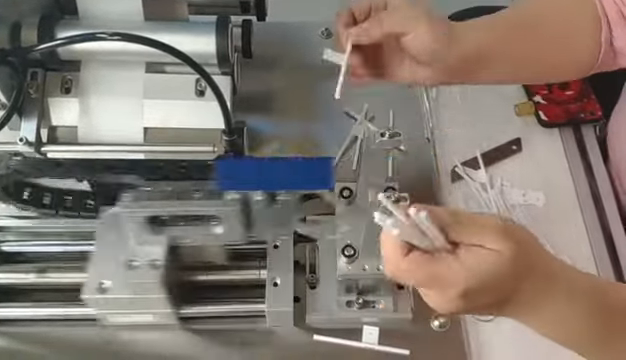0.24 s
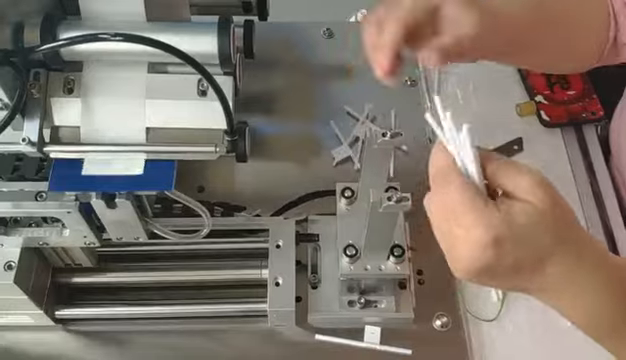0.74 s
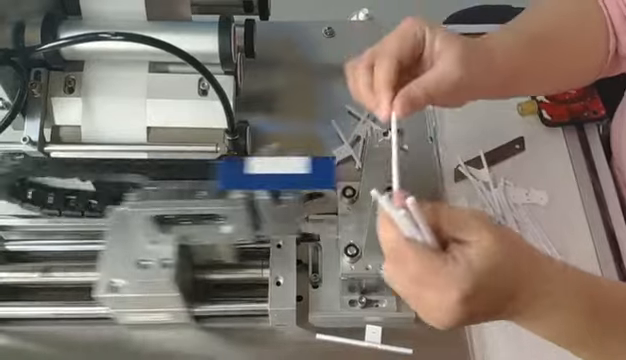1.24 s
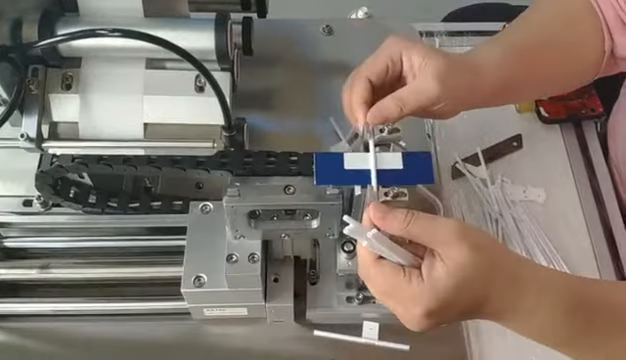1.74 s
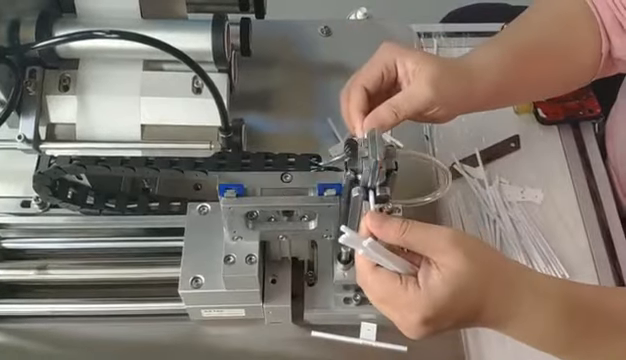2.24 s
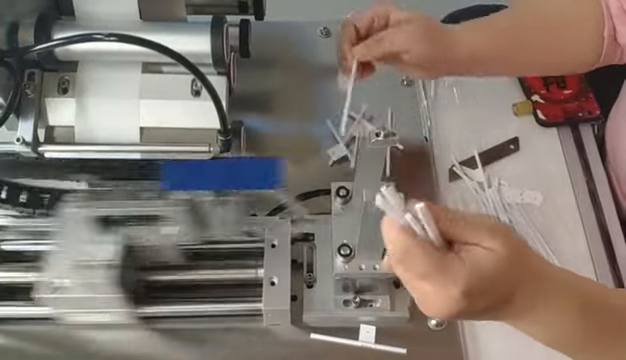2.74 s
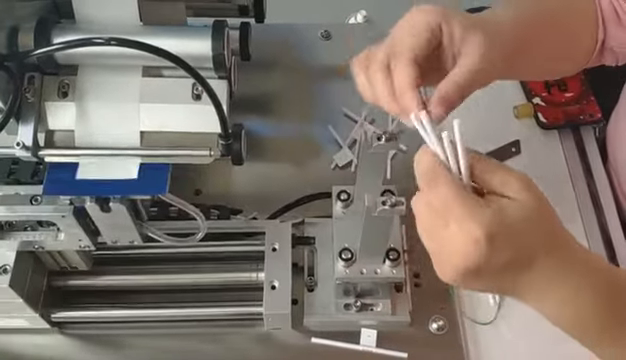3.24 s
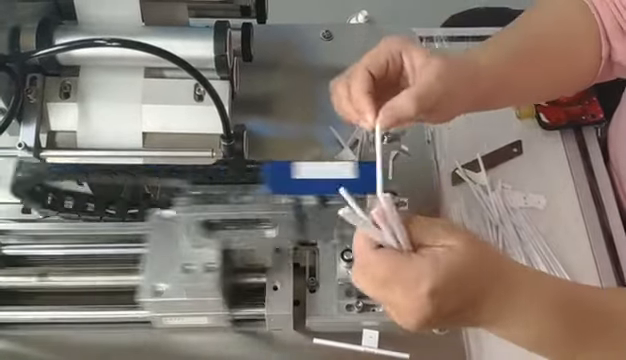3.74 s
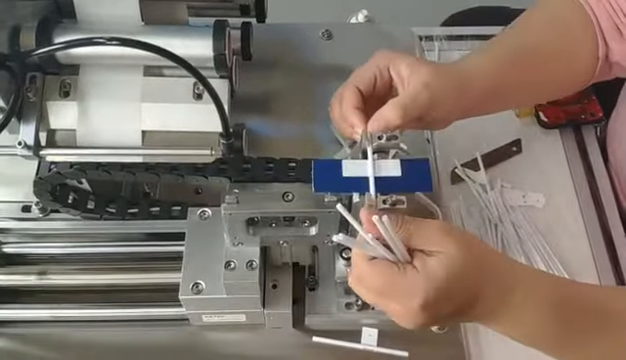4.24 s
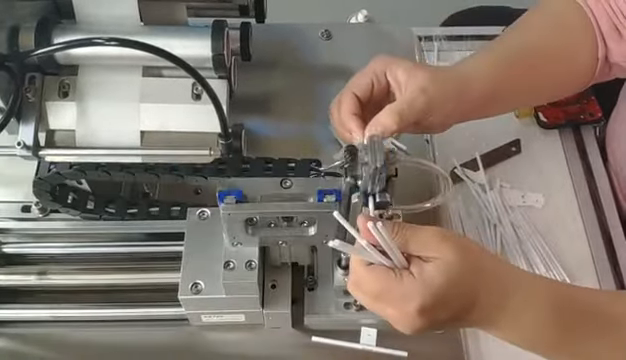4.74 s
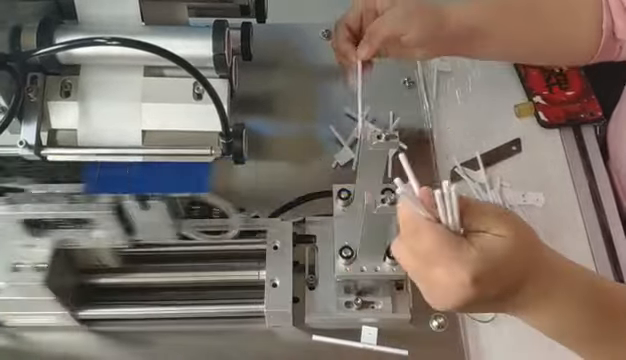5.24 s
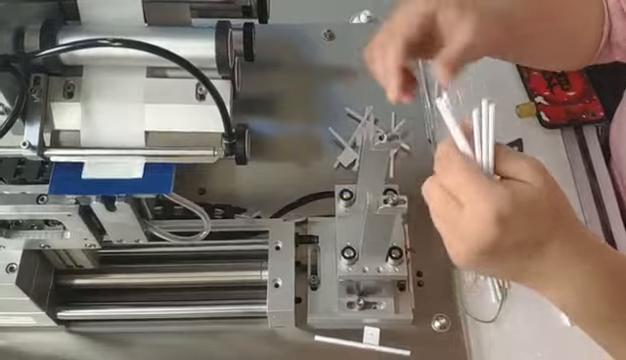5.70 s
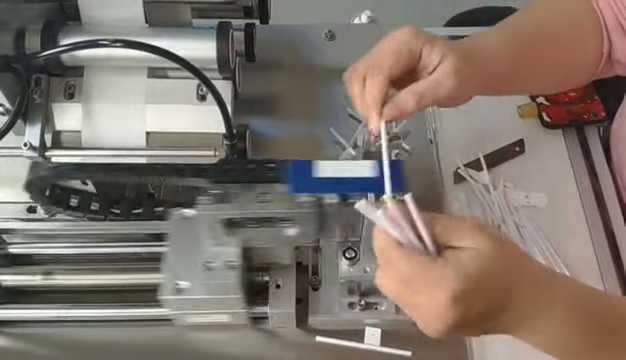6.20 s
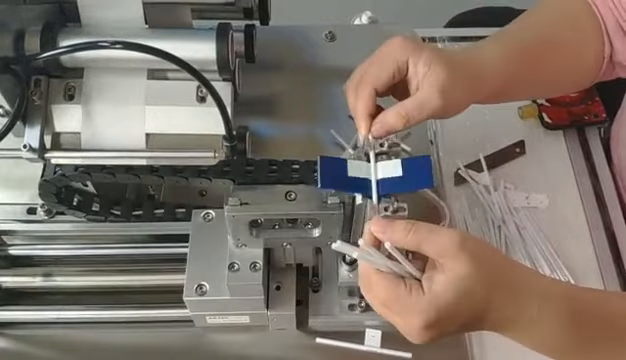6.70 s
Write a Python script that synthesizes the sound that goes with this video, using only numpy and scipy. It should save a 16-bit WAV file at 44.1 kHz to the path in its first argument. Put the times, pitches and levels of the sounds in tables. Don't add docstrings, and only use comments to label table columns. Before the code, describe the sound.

A pneumatic machine cycles on a bench: whistling suction hiss, sharp jaw clack, air puffs, a sliding bang, then a short air blast, over low rumble.

```python
import sys
import numpy as np
from scipy import signal
from scipy.fft import rfft, irfft, next_fast_len
from scipy.io import wavfile
from scipy.ndimage import uniform_filter1d, map_coordinates

SR = 44100
rng = np.random.default_rng(int(sys.argv[2]) if len(sys.argv) > 2 else 0)


def rack_gain(trim_db):
    fader = np.asarray(trim_db, float)
    return 10 ** (fader / 20)


def materialize(psi):
    bounded = np.clip(np.atleast_2d(psi).T, -1, 1)
    quanta = np.round(bounded * 32767).astype(np.int16)
    wavfile.write(sys.argv[1], SR, quanta)


N = 306936


def unit(x):
    return x / np.sqrt(np.mean(np.mean(np.atleast_2d(x), axis=0) ** 2) + 1e-20)


def along(points, hz):
    f, v = np.transpose(points)
    return np.interp(np.log(hz + 1), np.log(f + 1), v)


def since(s):
    return np.maximum(np.arange(N) / SR - s, 0)


def wobble(rate):
    knots = rng.standard_normal(int(N * rate / SR) + 4)
    return map_coordinates(knots, [np.arange(N) * rate / SR])


def filtered(x, response):
    m = next_fast_len(N + SR // 2)
    return irfft(rfft(x, m) * response(np.fft.rfftfreq(m, 1 / SR)), m)[..., :N]


def add(track, s, sound):
    part = track[..., max(round(s * SR), 0):][..., :sound.shape[-1]]
    part += sound[..., :part.shape[-1]]


# freq_hz, likeness
DIFFUSE_LIKENESS = [(30, .965), (240, .955), (490, .8), (900, .25), (1500, -.25), (2600, -.3), (6000, .05)]


def rush(spectrum, lean, patchy_db, bumps=(), alike=DIFFUSE_LIKENESS, lag=0):
    z = signal.stft(rng.standard_normal((2, N)), nperseg=512)[2]
    field = uniform_filter1d(rng.standard_normal(z.shape[1:]), size=4, axis=0)
    field = uniform_filter1d(field, size=8, axis=1)
    pair = signal.istft(z * rack_gain(patchy_db * field / field.std()), nperseg=512)[1][:, :N]

    def mid_side_gain(f):
        resonance = 1 + sum(rack_gain(db) / (1 + (2 * (f - c) / w) ** 2) for c, w, db in bumps)
        turn = np.arccos(np.clip(along(alike, f), -1, 1)) / 2
        return rack_gain(along(spectrum, f)) * resonance * np.array([np.cos(turn), np.sin(turn)])

    mid, side = filtered(pair, mid_side_gain)
    ports = np.array([mid + side, mid - side])
    left, right = filtered(ports, lambda f: rack_gain(along(lean, f) * np.array([[.5], [-.5]])))
    return unit(np.array([left, np.roll(right, shift=lag)]))


# freq_hz, level_db per Hz
NOZZLE_AIR = [(4500, -20), (5500, -30), (6200, -1), (6700, -1), (7200, 1.5), (7800, -7)]
JET_AIR = [(700, -27.5), (1400, -12), (2000, -5.5), (2300, -2), (2550, -0.5), (3250, 0), (3630, -1),
           (4000, 0), (4700, -2.5), (6000, 2.5), (7800, -22.5)]
# freq_hz, width_hz, level_db
WHISTLE = [(6542, 55, -1), (6910, 50, 2), (7113, 30, 8), (7310, 48, 4)]
HOSE = [(2078, 240, -4.5), (2490, 77, 1), (3237, 750, -0.5), (3920, 79, -6.5)]
# freq_hz, lean_db
LEFT_PORT = [(2500, .5), (4800, .5), (5800, 7), (6500, 11), (7200, 13)]
# freq_hz, likeness
DIRECT_LIKENESS = [(800, 0.27), (2500, 0.45), (4700, 0.16), (5500, 0.17), (7200, 0.043)]
# freq_hz, likeness
JET_LIKENESS = [(700, .6), (1050, .15), (1700, -.4), (2400, -.35), (3400, -.25), (3950, .3), (4700, -.35),
                (5600, 0)]


def air():
    nozzle = flow(hold_db=-29, surge_db=7.5, drop_db_per_s=117.5, leak_db=-40.5)
    nozzle = nozzle + puffs(opening_db=-31, return_db=-15.5)
    jet = flow(hold_db=-38, surge_db=1.3, drop_db_per_s=50, leak_db=-42)
    jet = jet + puffs(opening_db=-23.5, return_db=-28.5)
    gust = wobble(14)
    flutter = rack_gain(0.69 * gust + 1.2 * wobble(45))
    whistling = rush(NOZZLE_AIR, LEFT_PORT, patchy_db=-1.5, bumps=WHISTLE, alike=DIRECT_LIKENESS, lag=6)
    hissing = rush(JET_AIR, LEFT_PORT, patchy_db=3.0, bumps=HOSE, alike=JET_LIKENESS)
    return nozzle * flutter * whistling + jet * rack_gain(1.1 * gust) * hissing


GRIP_DELAY_S, GRIP_S, SETTLE_S = .03, 0.021, 0.35
LET_GO_S = 0.019
LEAK_SAG_DB_PER_S = 5
LEAK_PAST_STOP_S, LEAK_STEP_DB, LEAK_DROP_DB_PER_S = 0.028, -5.5, 25


def flow(hold_db, surge_db, drop_db_per_s, leak_db):
    out, t = np.zeros(N), np.arange(N) / SR
    grips = [-np.ptp(t)] + [s + length + GRIP_DELAY_S for s, db, length in BLASTS]
    ends = [(a[0], b[0]) for a, b in zip(OPENINGS, RETURNS)] + [(2 * t[-1], 2 * t[-1])]
    for grip, (opening, back) in zip(grips, ends):
        held = since(grip)
        level_db = hold_db + surge_db * np.exp(-held / SETTLE_S) - drop_db_per_s * since(opening - LET_GO_S)
        out += (1 - np.exp(-held / GRIP_S)) ** 2 * rack_gain(level_db) * (t < back)
    for (back, _), (stop, _), (blast_s, *_) in zip(RETURNS, STOPS, BLASTS):
        shut = since(stop + LEAK_PAST_STOP_S)
        level_db = leak_db - LEAK_SAG_DB_PER_S * since(back)
        level_db = level_db + LEAK_STEP_DB * (1 - np.exp(-shut / .008)) - LEAK_DROP_DB_PER_S * shut
        out += rack_gain(level_db) * (t >= back) * (t < blast_s)
    return out


# start_s, peak_db
OPENINGS = [
    (0.187, -19),
    (2.6, -20),
    (4.999, -20),
]
# start_s, peak_db
RETURNS = [
    (0.283, -16.5),
    (2.698, -15.5),
    (5.098, -15),
]


def puffs(opening_db, return_db):
    def puff(s, db, t60):
        return rack_gain(db - 60 * since(s) / t60) * (1 - np.exp(-since(s) / 0.0065)) ** 2

    opening = sum(puff(s, opening_db, 0.095) for s, _ in OPENINGS)
    leaving = sum(puff(s + .011, return_db, 0.16) for s, _ in RETURNS)
    return opening + leaving


# start_s, level_db, length_s
BLASTS = [
    (0.981, -18, .107),
    (3.395, -17.5, 0.11),
    (5.8, -17.5, .1),
]
# freq_hz, level_db per Hz
BLAST_AIR = [(300, -14), (600, -17.5), (1300, -9), (1800, -13), (2300, -5.5), (2650, -5), (3500, -5),
             (4300, -9.5), (5600, -2.5), (6500, 3), (7300, -0.5)]
# freq_hz, lean_db
RIGHT_SIDE = [(350, -4), (1300, -7), (1900, -3), (2900, -17), (3700, -12), (4500, -3), (5800, -5.5),
              (6500, -3), (7200, 1)]


def blast():
    level = 0
    for s, db, length in BLASTS:
        shut = since(s + length - .006)
        hose_dregs = rack_gain(-4.5 - 60 * shut / 0.34)
        fall = np.maximum(rack_gain(-60 * shut / .05), hose_dregs)
        snap = (1 - np.exp(-since(s - .007) / 0.0026)) ** 2
        fill = 1 - 0.16 * np.exp(-since(s) / 0.016)
        level = level + rack_gain(db) * fall * snap * fill
    noise = rush(BLAST_AIR, RIGHT_SIDE, patchy_db=2.5, alike=DIRECT_LIKENESS, lag=9)
    return level * rack_gain(0.27 * wobble(90)) * noise


# start_s, peak_db
STOPS = [
    (0.657, -19),
    (3.072, -18.5),
    (5.471, -18.5),
]
# freq_hz, level_db, t60_s
STOP_BLOCK = [(750, 5, 0.11), (932, 8.5, 0.1), (1361, 1.5, 0.1), (1520, -18, 0.026), (1987, -22, 0.066),
              (2323, 3.5, 0.083), (2634, 17.5, 0.063), (3246, 12, 0.073), (3380, -25.5, 0.14),
              (3500, -6, 0.15), (4370, -21, 0.027), (4940, -12, 0.022)]


def slide_stop():
    out = np.zeros(N)
    for s, db in STOPS:
        cushion = ring(STOP_BLOCK, stretch=0.47, contact=0.0099, crack=1.7, low_hz=1210)
        blow = ring(STOP_BLOCK, stretch=.3, contact=0.0036, crack=3.6, low_hz=1298)
        rebound = ring(STOP_BLOCK, stretch=0.67, contact=0.0046, crack=2.3, low_hz=687)
        add(out, s - .022, rack_gain(db - 17) * cushion)
        add(out, s - .001, rack_gain(db - 5.5) * blow)
        add(out, s + 0.014, rack_gain(db - 15) * rebound)
    return out


# start_s, peak_db
CLACKS = [
    (2.324, -16.5),
    (4.726, -16),
]
# freq_hz, level_db, t60_s
JAW_MODES = [(357, -8, 0.11), (526, 4.5, 0.041), (828, 8, 0.042), (896.4, -0.5, 0.15), (1260, -9, 0.087),
             (1417, 5.5, 0.051), (1830, -27.5, 0.045), (2220, 15.5, 0.025), (2390, 9, 0.054),
             (3400, -36, .05), (3800, 6.5, 0.13), (6100, -3, 0.38), (5670, -15.5, 0.071)]


def jaws():
    out = np.zeros(N)
    for s, db in CLACKS:
        touch = ring(JAW_MODES, stretch=0.34, contact=0.005, crack=3.1, low_hz=1430)
        blow = ring(JAW_MODES, stretch=0.55, contact=0.0021, crack=1.1, low_hz=403)
        rebound = ring(JAW_MODES, stretch=0.7, contact=0.0046, crack=0.91, low_hz=890)
        rattle = ring(JAW_MODES, stretch=0.3, contact=0.0024, crack=1.2, low_hz=880)
        add(out, s - .014, rack_gain(db - 12) * touch)
        add(out, s - .001, rack_gain(db - 5.5) * blow)
        add(out, s + 0.013, rack_gain(db - 19.5) * rebound)
        add(out, s + 0.045, rack_gain(db - 15) * rattle)
    return out


def ring(modes, stretch, contact, crack, low_hz):
    t = np.arange(SR // 2) / SR
    draw = rng.standard_normal((len(modes), 3))
    tone = 0
    for (hz, db, t60), (louder, detune, turn) in zip(modes, draw):
        decay = rack_gain(db + 0.77 * louder - 60 * t / (t60 * stretch))
        tone = tone + decay * np.sin(2 * np.pi * (hz * (1 + 0.023 * detune) * t + turn))
    rattle = t / contact * np.exp(1 - t / contact) * rng.standard_normal(len(t))
    band = signal.butter(2, [low_hz, 4500], "bandpass", fs=SR, output="sos")
    clatter = signal.sosfilt(band, rattle)
    return tone * (1 - np.exp(-t / contact)) ** 2 + crack * clatter


# start_s, peak_db, left_over_right_db
TICKS = [
    (0.74, -29, 10.0),
    (0.8334, -31, 2),
    (0.9728, -35.5, -14),
    (3.114, -32, 5.5),
    (3.1306, -23.5, 4),
    (3.376, -33.5, 10),
    (5.657, -29, 11.5),
    (5.792, -30.5, 10),
]
# freq_hz, level_db
TICK_COLOUR = [(1000, -15), (2000, 0.5), (5000, -0.5), (7300, 4), (8400, -6), (8900, -54)]


def ticks():
    out, t = np.zeros((2, N)), np.arange(SR // 20) / SR
    for s, db, pan_db in TICKS:
        shape = t / .0015 * np.exp(1 - t / .0015)
        burst = rack_gain(db + 1) * shape * rng.standard_normal((2, len(t)))
        add(out, s - .002, burst[0] * rack_gain(pan_db * np.array([[.5], [-.5]])))
        add(out, s + 0.013, rack_gain(-16.5) * burst)
    ports = np.array([out[0], np.roll(out[1], shift=6)])
    return filtered(ports, lambda f: rack_gain(along(TICK_COLOUR, f)))


def carriage():
    out, t = np.zeros(N), np.arange(SR // 20 * 2) / SR
    hum = np.sin(2 * np.pi * 374 * t) + .6 * np.sin(2 * np.pi * 1.3 * 374 * t)
    for s, db in RETURNS:
        add(out, s + 0.065, rack_gain(db - 16 - 60 * t / 0.3) * (1 - np.exp(-t / 0.013)) * hum)
    return out


def bench():
    out = np.zeros(N)
    t = np.arange(-SR // 20, SR // 20) / SR
    for s, db, (shoves, knocks) in strokes():
        for delay, over_db, hz in shoves:
            u = (np.pi * hz * t) ** 2
            add(out, s + delay + t[0], rack_gain(db + over_db) * (2 * u - 1) * np.exp(-u))
        for delay, over_db, stretch in knocks:
            add(out, s + delay, rack_gain(db + over_db) * knock(stretch))
    return out


# start_s, peak_db
FOLDS = [
    (2.152, -21),
    (4.552, -25),
    (6.815, -25),
]
# start_s, peak_db
ARRIVALS = [
    (1.622, -31),
    (4.04, -31),
    (6.44, -30),
]
# delay_s, level_db, ring_time_factor
FOLD = [(.009, 1, 98), (.054, 1, 140)], [(0.00037, 1, 0.28)]
OPENING = [(.008, .7, 90.5)], [(-.004, -5, 0.61)]
RETURN = [(.023, -3, 90), (.071, -8.5, 117)], [(0, -0.5, .3), (.022, -9, .61), (.048, -15, .4),
          (.065, -14, .7)]
STOP = [(.019, 1.5, 167)], [(.011, 1.2, .92)]
VALVE_ON = [(.004, -22, 83.6)], [(0, -9.5, 0.48)]
VALVE_OFF = [(.003, -7.5, 94.3)], []
ARRIVAL = [(.014, 2.8, 128.5)], [(0, 0, 1.03)]


def strokes():
    kinds = [(FOLDS, FOLD), (OPENINGS, OPENING), (RETURNS, RETURN), (STOPS, STOP), (ARRIVALS, ARRIVAL)]
    out = [(s, db, push) for rows, push in kinds for s, db in rows]
    for s, db, length in BLASTS:
        out += [(s, db, VALVE_ON), (s + length, db, VALVE_OFF)]
    return out


# freq_hz, level_db, t60_s
FRAME = [(120, -5, 0.47), (153, 0.5, 0.4), (167.7, -8, 0.17), (216, -1, 0.21), (232.4, -0.5, 0.17),
         (292, -0.5, .4), (330.3, -5, 0.17), (383.3, 5.5, 0.11), (453, -6, 0.47), (536, -11.5, 0.48),
         (662, -16.5, 0.42), (807, -8, 0.25), (1063, -8, 0.15), (1400, -10.5, 0.061)]


def knock(stretch):
    t = np.arange(SR // 2) / SR
    draw = rng.standard_normal((len(FRAME), 2))
    drift = np.cumsum(.022 * rng.standard_normal((len(FRAME), len(t))), axis=1)
    drift = uniform_filter1d(drift, size=200, axis=1)
    modes = 0
    for (hz, db, t60), (louder, detune), wander in zip(FRAME, draw, drift):
        decay = rack_gain(db + 2 * louder - 60 * t / (t60 * stretch))
        modes = modes + decay * np.sin(2 * np.pi * hz * (1 + .03 * detune) * t + wander)
    return (1 - np.exp(-t / 0.0012)) / 3 * modes


# freq_hz, level_db per Hz
RUMBLE = [(8.8, -32.5), (15, -18.5), (38, 0.5), (59, -6), (86, -10.5), (120, -21.5), (160, -51.5),
          (260, -120)]
DRONE = [(50, -25.5), (110, -1.5), (200, -4), (290, -5), (450, -11), (700, -14), (1000, -30)]
MURMUR = [(350, -21.5), (600, -5.5), (1000, -1.5), (1500, -7.5), (2500, -8), (4500, -14), (7800, -22)]


def shop():
    shudder = 0
    for s, db in RETURNS + STOPS:
        shudder = shudder + rack_gain(db - 60 * since(s) / .9) * (1 - np.exp(-since(s) / 0.036))
    rumble = rack_gain(-44 + 1.5 * wobble(9) + 1.2 * wobble(3)) * rush(RUMBLE, LEFT_PORT, patchy_db=1.1)
    drone_level = (rack_gain(-42.5) + rack_gain(-20.5) * shudder) * rack_gain(1.5 * wobble(6))
    drone = drone_level * rush(DRONE, LEFT_PORT, patchy_db=1.0)
    murmur = (rack_gain(-52.5) + rack_gain(-29.5) * shudder) * rush(MURMUR, LEFT_PORT, patchy_db=1.0)
    return rumble + drone + murmur


# freq_hz, t60_s
WALLS = [(150, 0.17), (1000, 0.48), (8000, 0.17)]


def room(x):
    hz, t, z = signal.stft(rng.standard_normal((2, SR // 2)), SR, nperseg=256)
    tail = signal.istft(z * rack_gain(-60 * t / along(WALLS, hz)[:, None]), SR, nperseg=256)[1]
    tail = tail / np.linalg.norm(tail[0])
    return signal.fftconvolve(np.pad(x, (300, 0))[None], tail, axes=1)[:, :N]


TOP_HZ = 7550
# freq_hz, step_db
COARSE = [(150, -14), (500, -6), (1100, 4), (2000, 6), (3200, 5), (4800, 6.5), (5600, -2), (6500, -10)]
# freq_hz, step_db
SIDE_COARSE = [(250, 2), (400, -7), (600, -40)]


def phone(x, size=1024):
    k, n = np.arange(int(TOP_HZ * 2 * size / SR)) + .5, np.arange(2 * size) + .5
    window = np.sin(np.pi * n / (2 * size))[:, None]
    basis = window * np.cos(np.pi / size * np.outer(n + size / 2, k)) * np.sqrt(2 / size)
    mid_side = [x[0] + x[1], x[0] - x[1]]
    halves = np.pad(mid_side, ((0, 0), (size, 2 * size - N % size))).reshape(2, -1, size)
    lines = np.concatenate([halves[:, :-1], halves[:, 1:]], axis=2) @ basis

    local = np.sqrt(np.abs(uniform_filter1d(lines ** 2, size=40, axis=2)) + 1e-20)
    thrift = uniform_filter1d(rng.standard_normal(lines.shape), size=7, axis=2)
    hz = k * SR / (2 * size)
    step = local * rack_gain(along(COARSE, hz) + 8 * thrift)
    side_floor = local[0] * rack_gain(along(SIDE_COARSE, hz) + 14 * thrift[1, :, :1])
    step[1] = np.maximum(step[1], side_floor)
    rounded = step * np.sign(lines) * np.floor(np.abs(lines) / step + .42)

    treble = np.sum(np.diff(halves, axis=2) ** 2, axis=(0, 2)) + 1e-20
    sudden = np.convolve(treble[1:] / treble[:-1] > 3.5, np.ones(3), "same") > 0
    frames = np.where(sudden[:, None], lines, rounded) @ basis.T
    mid, side = (frames[:, :-1, size:] + frames[:, 1:, :size]).reshape(2, -1)[:, :N]
    return np.array([mid + side, mid - side]) / 2


def scene():
    steel = slide_stop() + jaws()
    frame = bench() + carriage()
    steel_ports = np.array([steel, np.roll(steel, shift=4)]) * rack_gain([[.6], [-.6]])
    frame_ports = np.array([frame, np.roll(frame, shift=5)])
    echoes = room(rack_gain(-13.5) * steel + rack_gain(-19.5) * frame)
    lasting = air() + blast() + steel_ports + frame_ports + echoes + shop()
    return filtered(phone(lasting), lambda f: f < TOP_HZ) + ticks()


def low_pass(x):
    return signal.sosfilt(signal.butter(12, 8820, fs=SR, output="sos"), x)


def record(dry):
    return low_pass(dry)


dry = scene()
out = record(dry)
materialize(out)
```